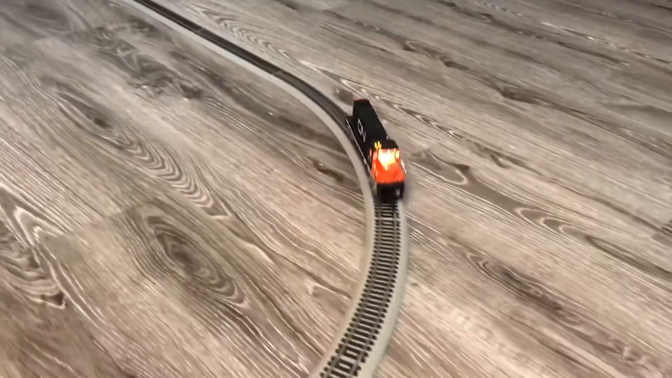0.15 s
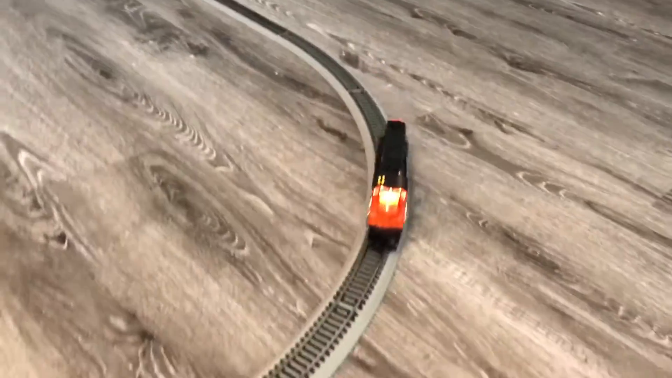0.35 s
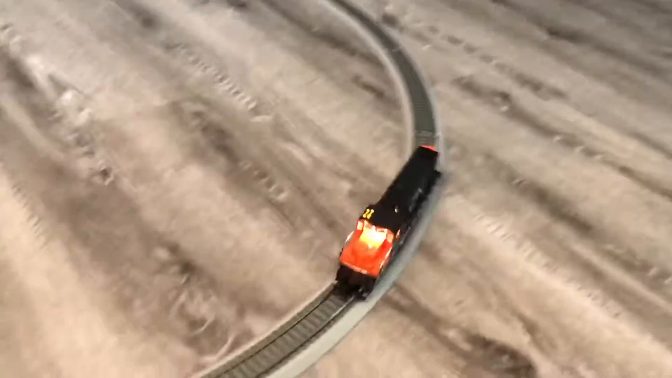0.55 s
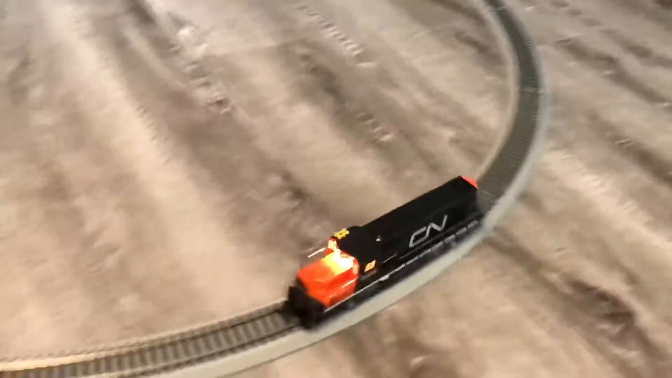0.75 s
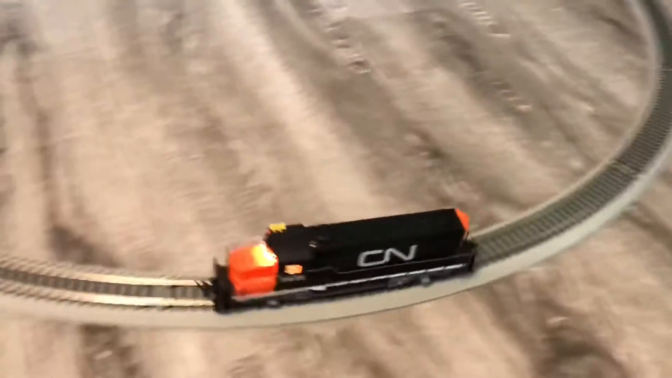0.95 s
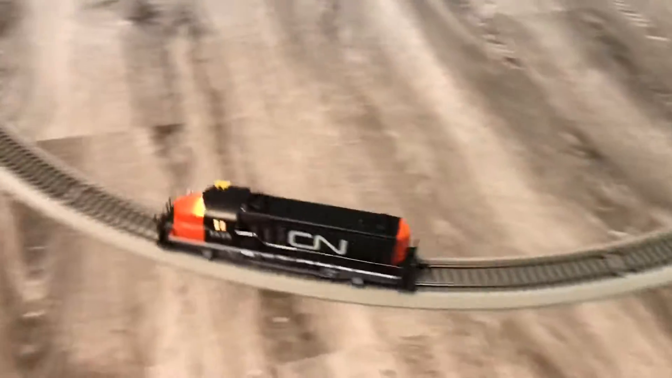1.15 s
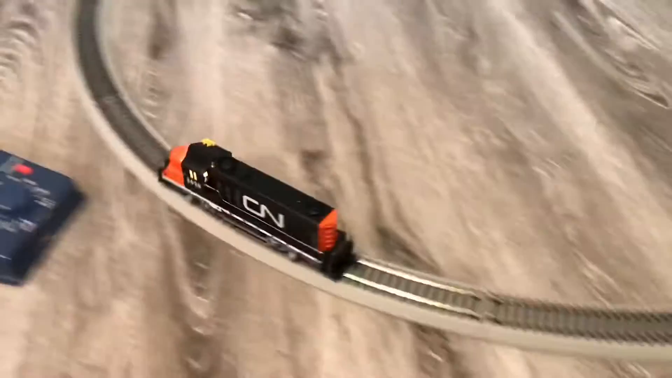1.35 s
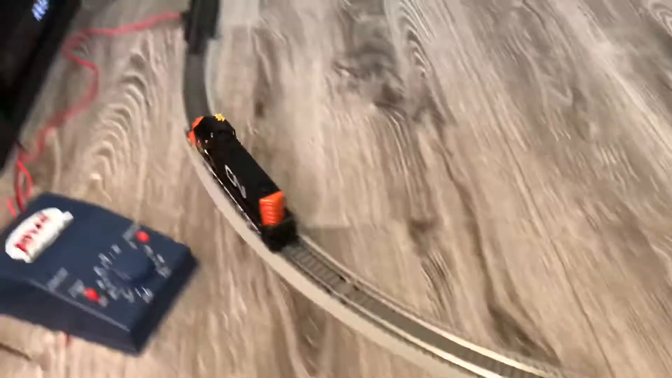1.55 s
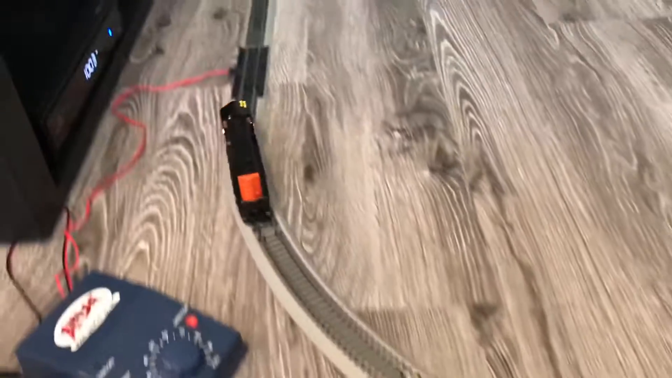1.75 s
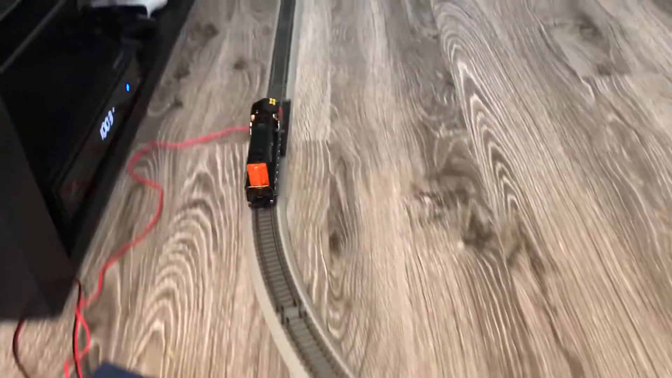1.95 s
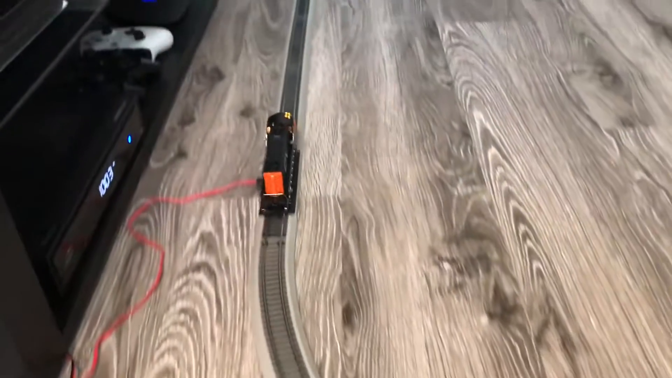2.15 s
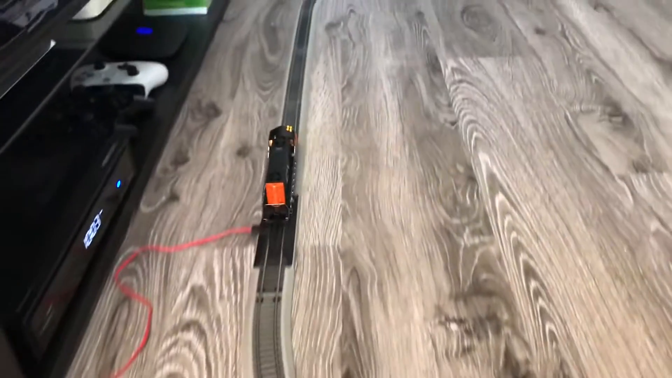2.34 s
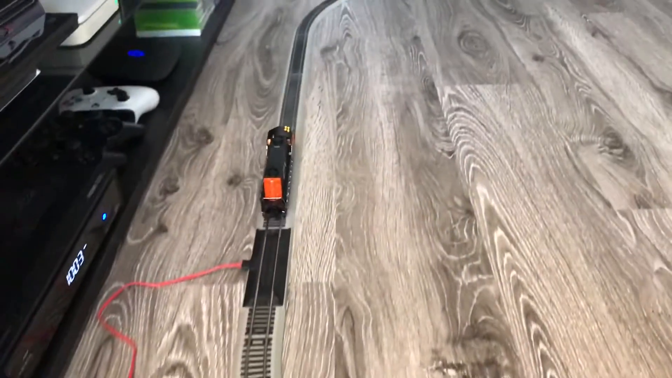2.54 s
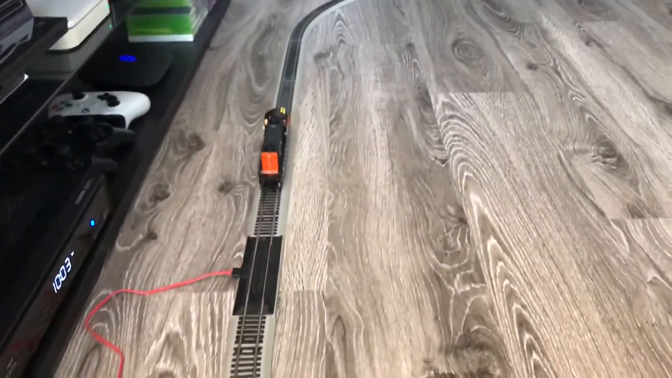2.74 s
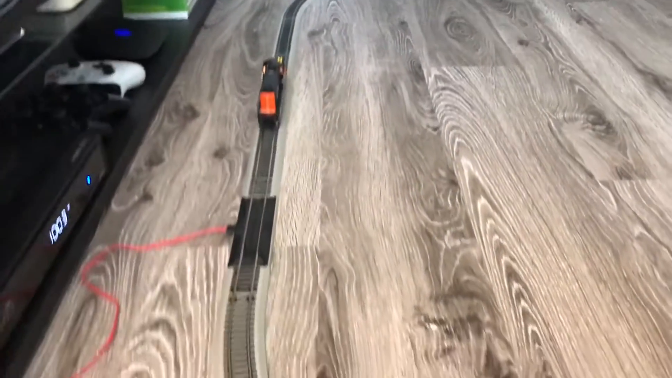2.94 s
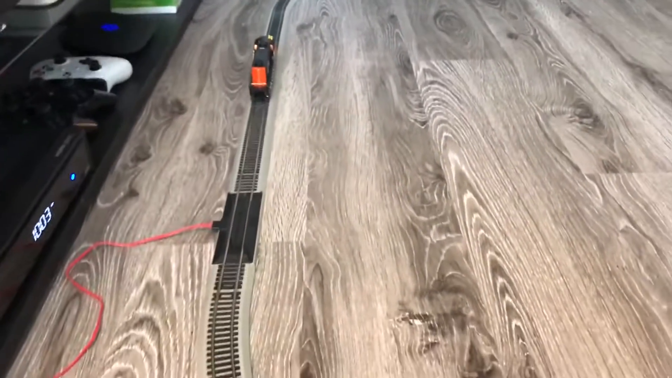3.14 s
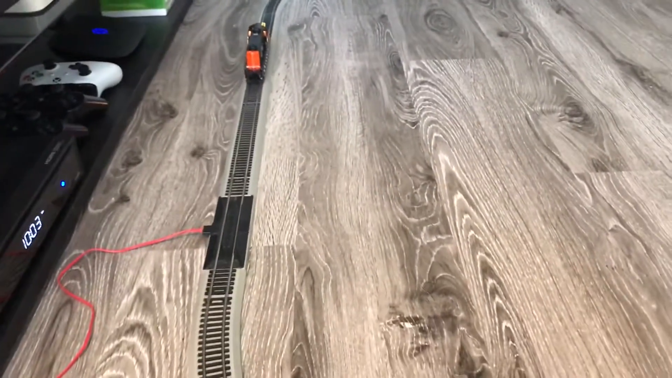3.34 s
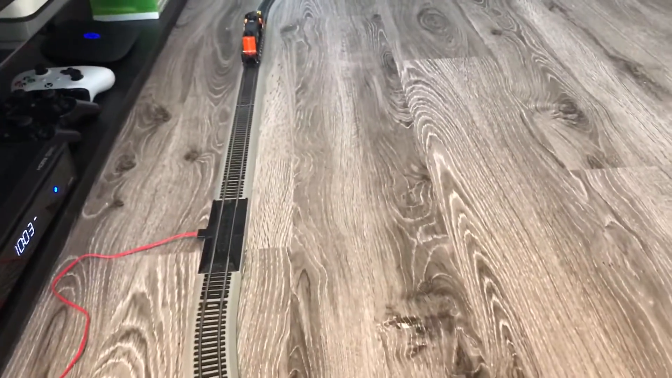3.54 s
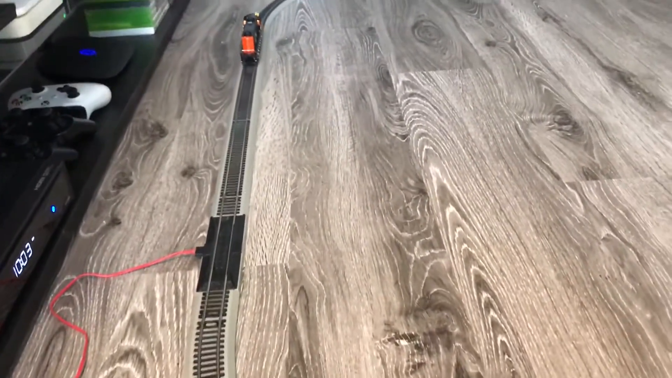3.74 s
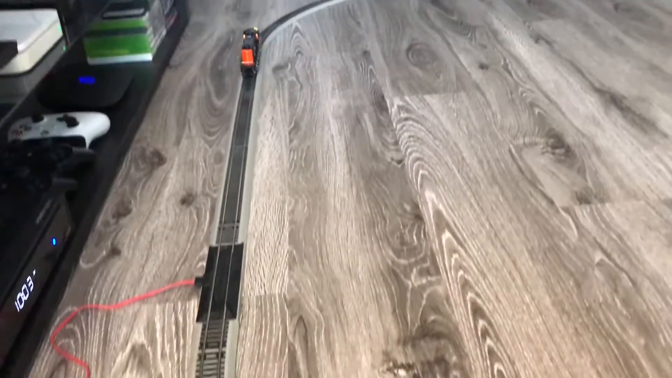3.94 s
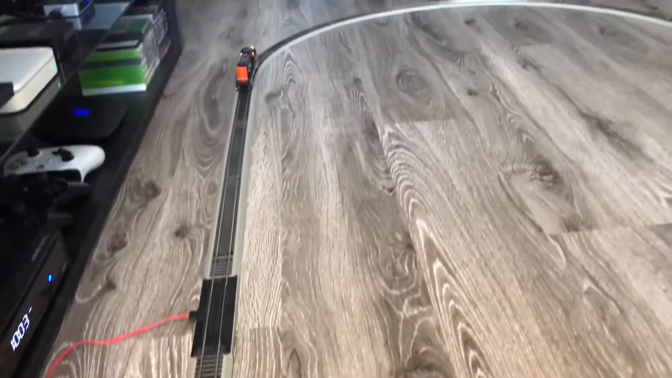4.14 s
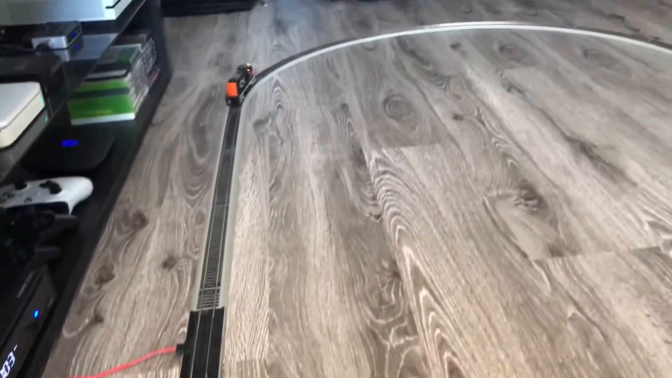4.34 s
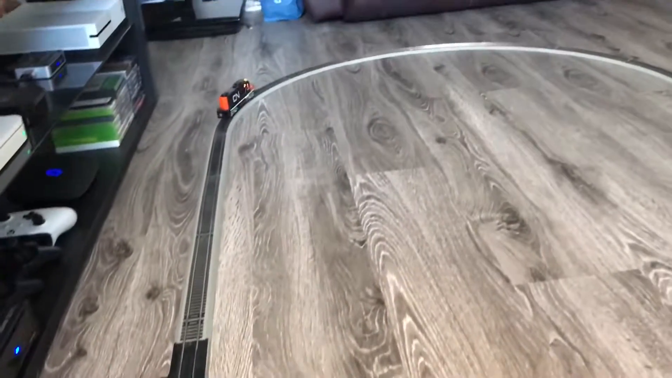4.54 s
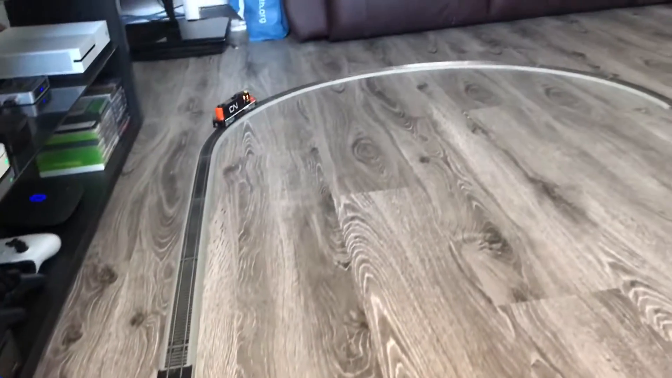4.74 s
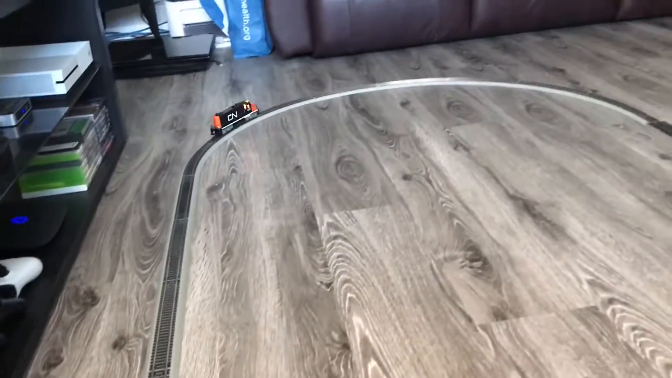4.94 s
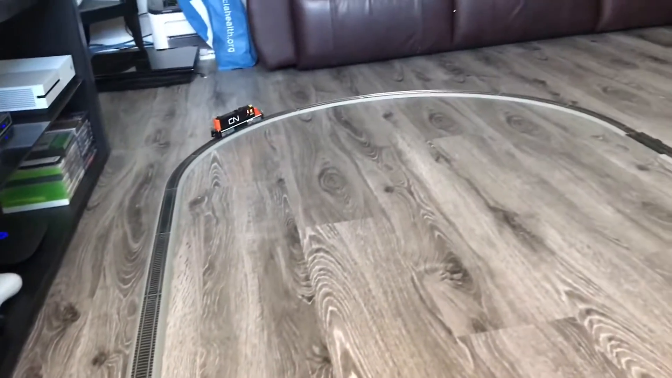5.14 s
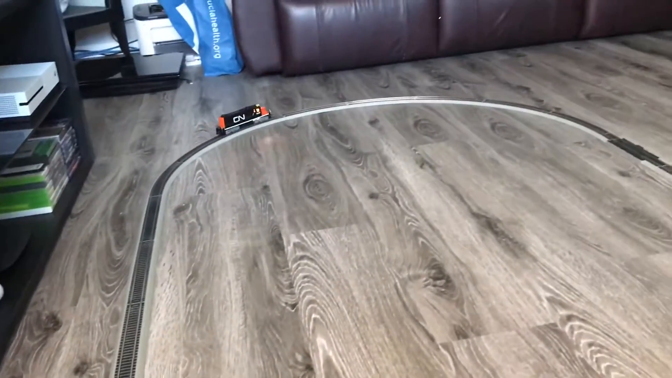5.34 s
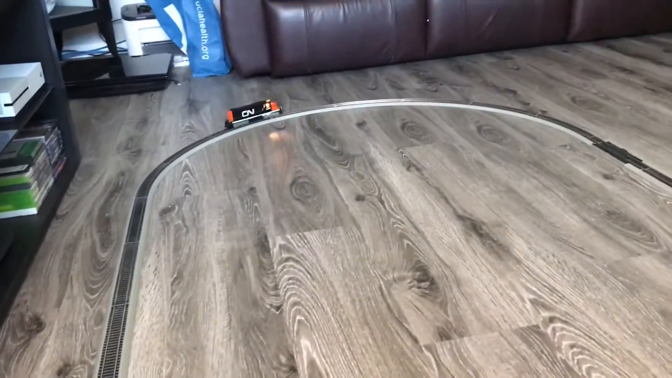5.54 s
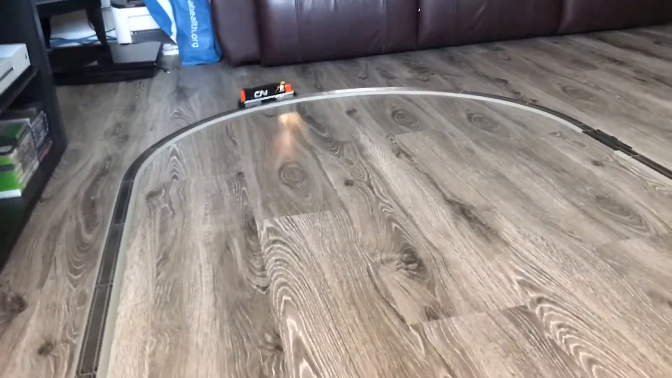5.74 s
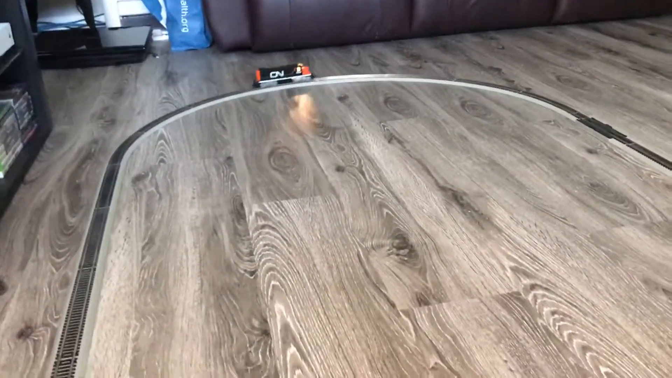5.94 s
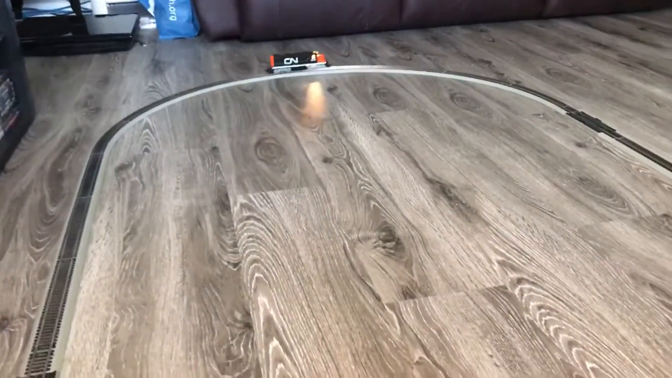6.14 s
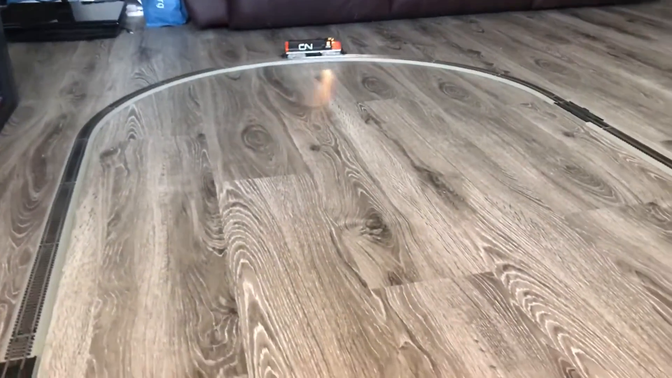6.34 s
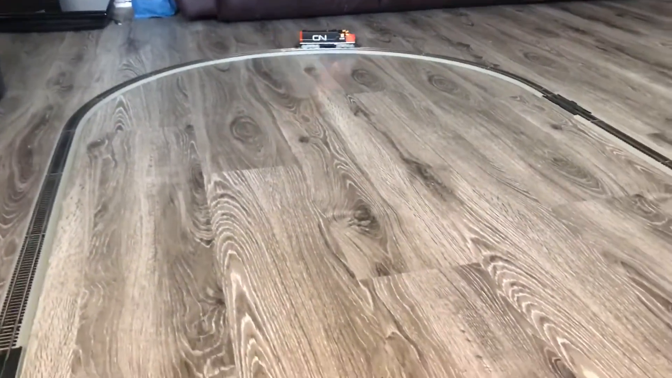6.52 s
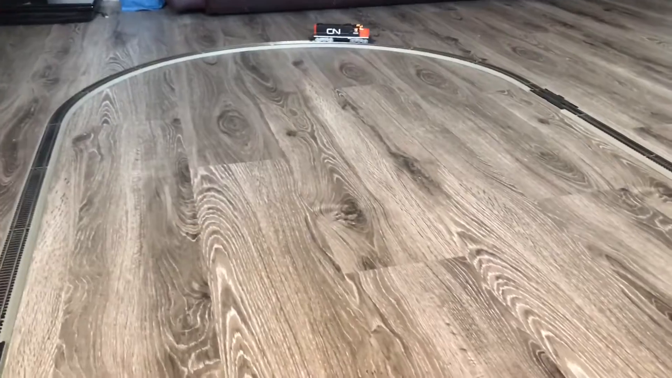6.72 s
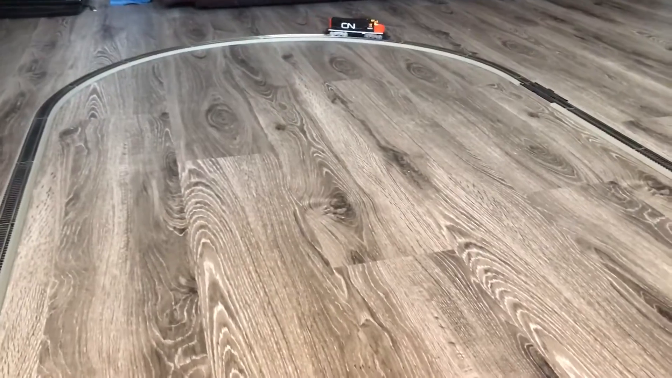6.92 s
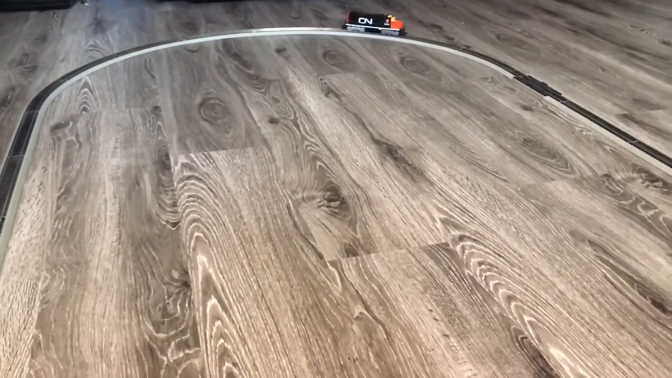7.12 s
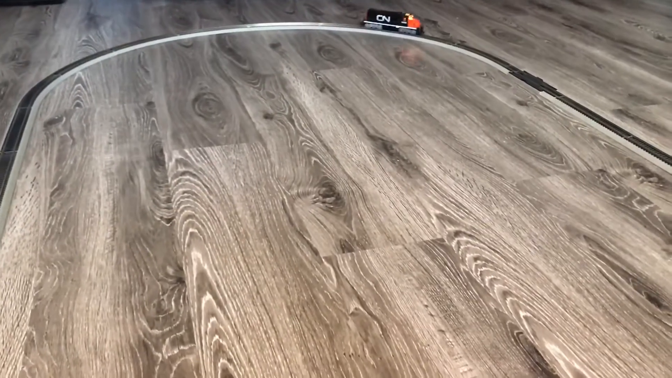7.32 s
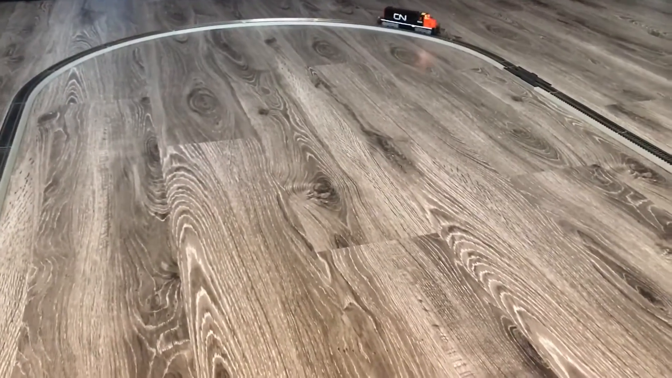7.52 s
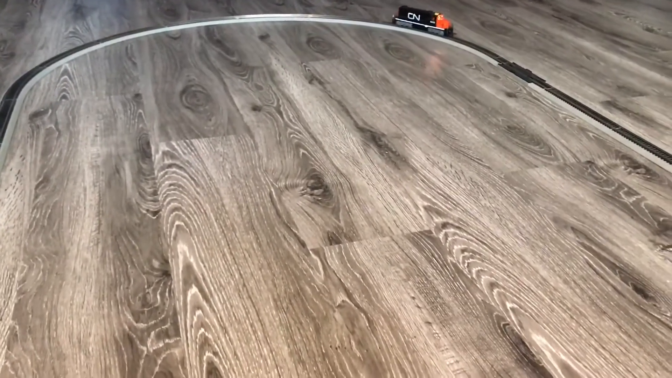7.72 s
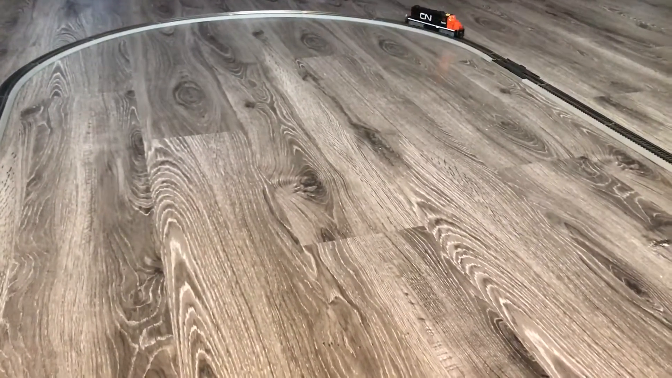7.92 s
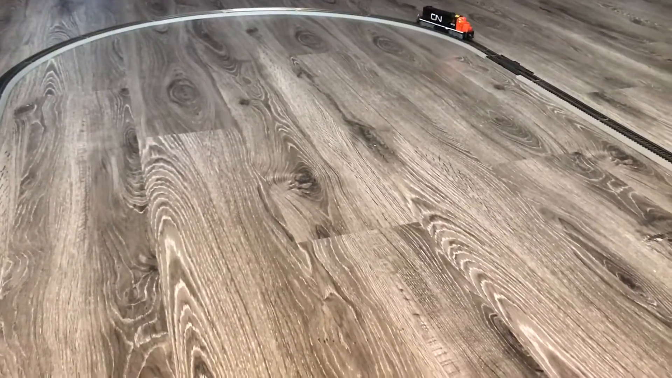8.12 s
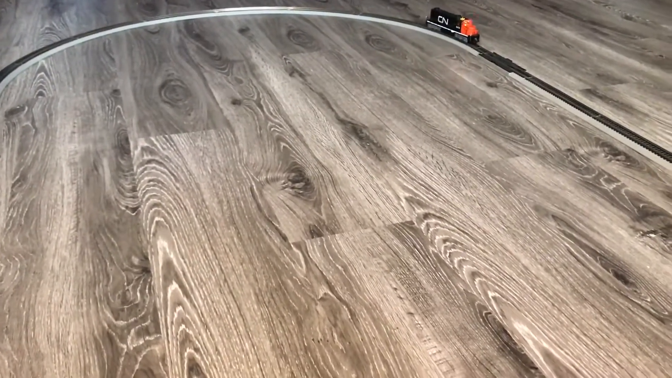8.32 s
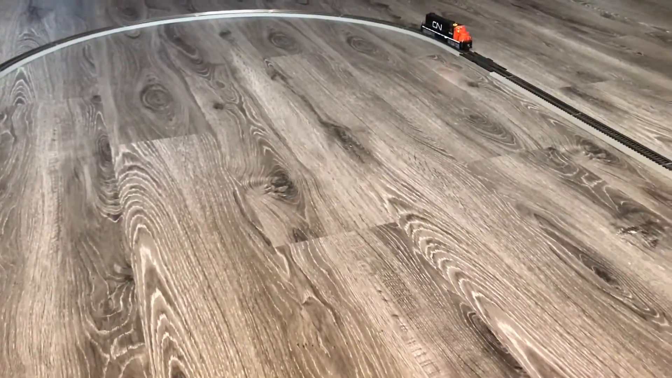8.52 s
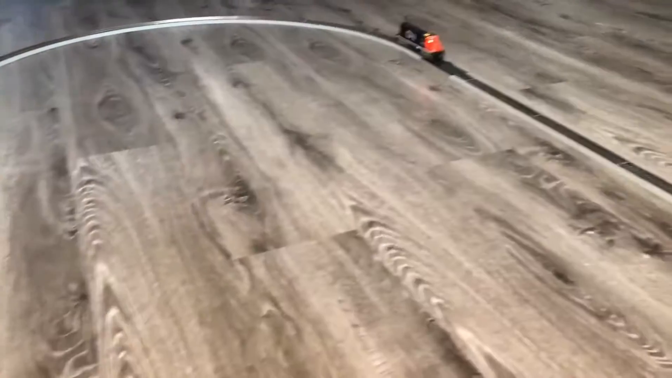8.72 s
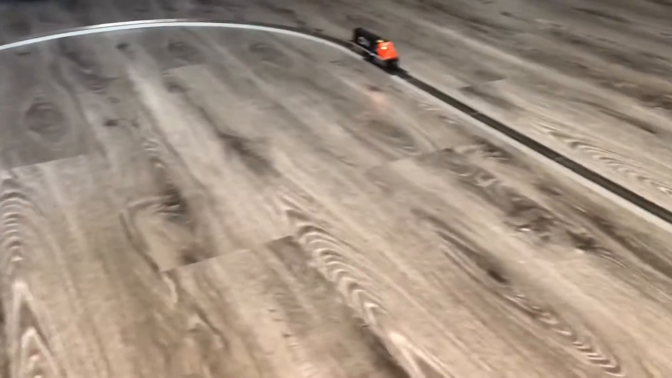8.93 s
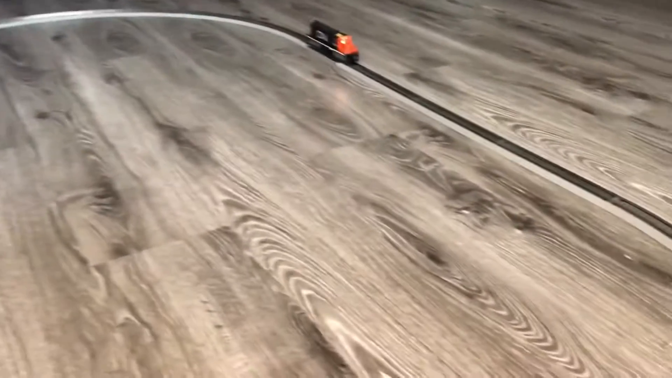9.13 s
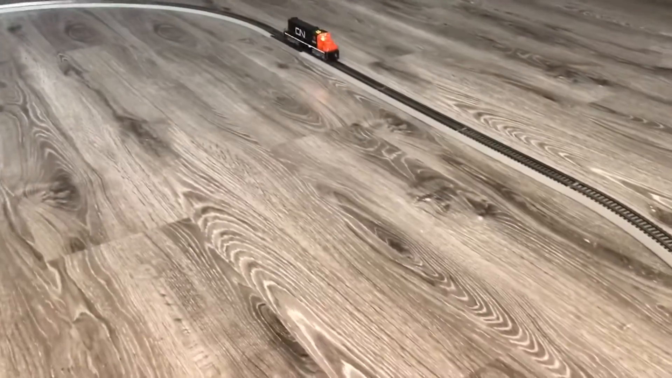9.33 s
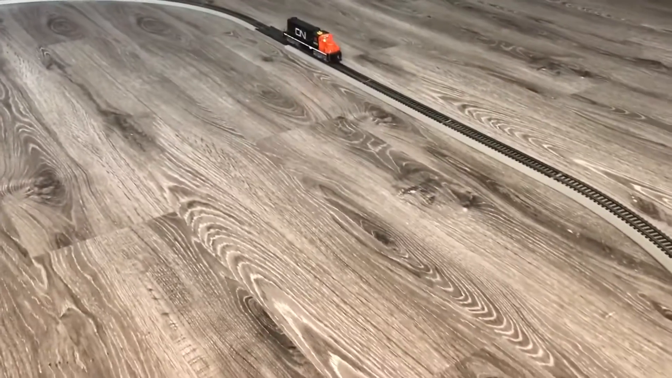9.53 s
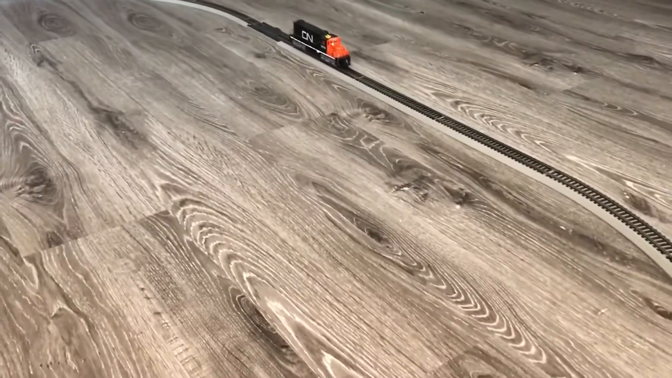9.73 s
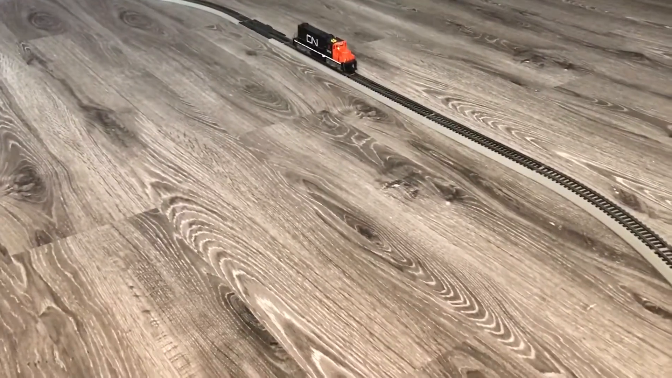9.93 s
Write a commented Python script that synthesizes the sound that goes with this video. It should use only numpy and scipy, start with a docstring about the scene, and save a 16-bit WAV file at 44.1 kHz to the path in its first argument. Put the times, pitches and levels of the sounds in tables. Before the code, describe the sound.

A model locomotive runs continuously round a plastic track on a wooden floor, with a high, wavering gear whir, a dry squeaky edge and gritty rolling hiss. For the first two seconds it passes close to the microphone: metal wheels rattle, click rapidly over rail joints and squeak in the curve, with a few soft knocks from the floorboards. The whir dips in pitch around 1.5 seconds, then rises and is loudest at about 2 seconds. After two more clicks near 2.6 seconds, the rolling grows quieter across the room while the whir keeps swelling and fading, with scattered thin squeaks and brief growls. From about 7.5 seconds the pitch sags as the engine slows. The gears catch in short rasps between 8.5 and 9.6 seconds as the speed briefly recovers. Short room echoes, a low rumble and a faint hum lie underneath.

```python
"""A model locomotive runs round an oval of plastic track on a wooden floor, close by, then across the room.
Its gear teeth whir and squeak at an unsteady pitch that sags as it slows; at times they bind and growl.
The wheels crush grit, rattle and tick over rail joints, and their flanges stick and slip in the curves.
Track bed and floor boards resonate under them. Short room echoes smear the engine's sound,
over a low rumble and a faint hum."""
import sys
import numpy as np
from scipy import signal
from scipy.fft import rfft, irfft, next_fast_len
from scipy.io import wavfile
from scipy.ndimage import uniform_filter1d

SR = 44100
rng = np.random.default_rng(int(sys.argv[2]) if len(sys.argv) > 2 else 0)


def to_wav(sig):
    """Store sig (one row per channel, or 1-D mono) as 16-bit WAV at the path in sys.argv[1].

    Samples outside -1..1 are clipped; the rate is SR.
    """
    pcm = np.clip(np.atleast_2d(sig), -1, 1) * 32767
    pcm = np.round(pcm).astype(np.int16)
    wavfile.write(sys.argv[1], SR, pcm.T)  # frames by channels


N = 439677
T = np.arange(N) / SR
CRUISE_HZ = 1833  # tooth rate at cruising speed


def undb(db):
    """Decibels to gain."""
    return 10 ** (np.asarray(db) / 20)


def unit(x):
    """Scale to rms 1."""
    return x / np.sqrt(np.mean(x ** 2))


def curves(rows):
    """Table columns, interpolated linearly in time."""
    times_s, *columns = np.transpose(rows)
    return [np.interp(T, times_s, column) for column in columns]


def phase_of(hz):
    """Running phase in radians of a varying frequency."""
    return 2 * np.pi * np.cumsum(hz) / SR


def decay(t, t60_s):
    """Envelope that falls 60 dB in t60_s."""
    return np.exp(-np.log(1000) * t / t60_s)


def walk(rate_hz):
    """Smooth random motion, rms 1, rolled off above rate_hz."""
    size = next_fast_len(N, True)
    hz = np.arange(size // 2 + 1) * SR / size
    spectrum = rfft(rng.standard_normal(size)) / (1 + (hz / rate_hz) ** 4)
    return unit(irfft(spectrum, size)[:N])


def sway(rate_hz, settle_s=0.15):
    """Random motion, rms 1, pulled back to centre within settle_s."""
    motion = walk(rate_hz)
    return unit(motion - uniform_filter1d(motion, int(settle_s * SR)))


def grit(per_s, spread_db):
    """Tiny random contacts of uneven size, rms 1."""
    hits = rng.random(N) < per_s / SR
    return unit(hits * rng.standard_normal(N) * undb(spread_db * np.clip(rng.standard_normal(N), -2, 2)))


def burst(start_s, decay_s):
    """Noise with a sudden onset and exponential decay."""
    age_s = T - start_s
    return rng.standard_normal(N) * (age_s >= 0) * np.exp(-np.clip(age_s / decay_s, 0, 20))


def swells(rows, bend, tremble_hz, rasp_db):
    """One trembling tone per row under a bell-shaped envelope."""
    warped_s = np.cumsum(1 + bend * walk(tremble_hz)) / SR
    tones = np.zeros(N)
    for peak_s, length_s, hz, db in rows:
        near = np.abs(T - peak_s) < 2 * length_s
        bell = np.exp(-(2 * (T[near] - peak_s) / length_s) ** 2)
        tones[near] += np.sqrt(2) * undb(db) * bell * np.sin(2 * np.pi * hz * warped_s[near])
    return tones * unit(undb(rasp_db * walk(230)))


def colour(x, spectrum, size=8192):
    """Minimum-phase filter through (Hz, dB) points, falling 20 dB per octave outside them."""
    hz, db = np.transpose(spectrum)
    bin_hz = np.maximum(np.arange(size // 2 + 1) * SR / size, 1)
    octaves_outside = np.maximum(np.log2(hz[0] / bin_hz), 0) + np.maximum(np.log2(bin_hz / hz[-1]), 0)
    gain_db = np.interp(np.log(bin_hz), np.log(hz), db) - 20 * octaves_outside
    cepstrum = irfft(np.log(undb(gain_db)))
    cepstrum[1:size // 2] *= 2
    cepstrum[size // 2 + 1:] = 0
    return signal.fftconvolve(x, irfft(np.exp(rfft(cepstrum))))[:N]


def fade_db(start_s=9.83, db_per_s=40):
    """Closing fall in level."""
    return -db_per_s * np.maximum(T - start_s, 0)


# Each row: time in seconds, tooth rate in Hz.
TOOTH_RATE = [(0, 1742), (.75, 1736), (.95, 1693), (1.1, 1602), (1.5, 1578), (1.88, 1642), (1.96, 1820),
              (2.08, 1900), (2.2, 1880), (2.35, 1815), (2.7, 1863), (3.2, 1793), (3.55, 1817), (3.65, 1752),
              (3.75, 1862), (4.05, 1757), (4.3, 1794), (4.7, 1793), (4.8, 1722), (4.9, 1810), (5.15, 1812),
              (5.7, 1750), (6.0, 1797), (6.6, 1785), (6.85, 1760), (7.15, 1719), (7.5, 1685), (7.9, 1596),
              (8.2, 1520), (8.45, 1520), (8.7, 1443), (9.0, 1506), (9.35, 1650), (9.65, 1626), (9.97, 1469)]


def tooth_hz():
    """Gear meshing rate, proportional to the engine's speed."""
    return curves(TOOTH_RATE)[0]


# Each row: tooth rate in Hz, play from 0 to 1.
DRIVE_PLAY = [(1500, 1), (1790, .82), (1890, .53)]


def drive_play():
    """The gears sit more loosely as they slow."""
    return np.interp(tooth_hz(), *np.transpose(DRIVE_PLAY))


# Each row: time in seconds, distance in metres, side-on view from 0 to 1, flange pressure from 0 to 1.
OVAL_ROUTE = [(0, 0.72, 0.2, 0.95), (.35, 0.7, 0.25, 1), (.7, 0.57, 0.36, 0.48), (1.15, 0.46, 1, 0.6),
              (1.7, 0.42, 0, 0.6), (2.0, 0.6, 0.04, 0.3), (2.27, 1.3, 0.25, 0), (2.7, 1.11, 0.07, 0.1),
              (3.4, 1.87, 0.6, 0.8), (3.9, 2.46, 1, 1), (4.3, 2.03, 0.4, 0.8), (5.3, 2.06, 0.81, 0.57),
              (6.4, 1.99, 1, 0.35), (7.3, 2.5, 0.71, 0.32), (8.7, 2.33, 0.5, 0.54), (9.1, 1.55, 0.52, 0.17),
              (9.97, 2.2, .55, 0.34)]


def rolling(db, far_db, fast_db, side_db=0, press_db=0):
    """Rolling gain: db at 1 m and cruise, far_db per doubled distance, fast_db per 10% more speed."""
    distance_m, side_on, pressure = curves(OVAL_ROUTE)
    speed_steps = 10 * np.log(tooth_hz() / CRUISE_HZ)
    level_db = db + far_db * np.log2(distance_m) + fast_db * speed_steps
    return undb(level_db + side_db * side_on + press_db * pressure + fade_db())


def room(x, wet_db, t60_s, far_db=3.5, tails=3):
    """Direct sound plus shifting echoes, their share wet_db at 1 m plus far_db per doubled distance."""
    t = T[:SR // 2]
    echoes = 0
    for k in range(tails):
        tail = rng.standard_normal(len(t)) * decay(t, t60_s) * (t > 0.003)
        crossfade = np.cos(2 * np.pi * (0.7024 * T + k / tails)) * np.sqrt(2 / tails)
        echoes += signal.oaconvolve(x * crossfade, tail / np.linalg.norm(tail))[:N]
    distance_m = curves(OVAL_ROUTE)[0]
    wet = undb(wet_db + far_db * np.log2(distance_m))
    return (x + wet * echoes) / np.sqrt(1 + wet ** 2)


def mesh_phase(hz, wobble, flutter, wobble_hz=38, teeth=28, runout=0.023):
    """Tooth phase of an out-of-round gear; play scales its runout, wobble and flutter."""
    turn = phase_of(hz / teeth * (1 + 0.1016 * walk(12.14)))
    uneven = runout * np.sin(turn) + wobble * sway(wobble_hz) + flutter * sway(198.4)
    return phase_of(hz * (1 + drive_play() * uneven))


# Each row: time in seconds, level in dB.
WHIR_LEVEL = [(0, -49), (.62, -47), (.71, -31), (.77, -45), (.85, -33.5), (1.05, -35.5), (1.45, -40),
              (1.57, -39), (1.78, -43), (1.94, -26), (2.09, -25.5), (2.18, -29), (2.4, -35), (2.62, -35),
              (2.78, -33.5), (3.27, -37), (3.45, -36), (3.57, -36), (3.64, -33.5), (3.9, -34.5),
              (3.99, -42.5), (4.14, -38.5), (4.44, -34.5), (4.64, -40.5), (4.77, -30), (4.97, -39),
              (5.1, -33.5), (5.33, -38.5), (5.55, -36), (5.82, -33), (5.9, -30), (6.05, -36), (6.25, -33.5),
              (6.5, -35.5), (6.68, -34), (6.87, -32.5), (7.0, -38), (7.14, -38), (7.33, -35), (7.65, -38.5),
              (7.8, -38), (8.17, -35), (8.37, -40.5), (8.9, -40), (9.25, -36), (9.45, -35.5), (9.63, -35.5),
              (9.97, -45.5)]
# Each row: time in seconds, level in dB relative to the rail hiss.
GEAR_SQUEAK_LEVEL = [(0, -12), (1.8, -3.5), (2.5, 0.5), (3.4, 1.5), (4.0, -3), (4.6, -2), (5.6, -4),
                     (6.3, -1), (6.9, 0), (7.5, 2), (8.25, -1), (8.7, -4), (9.4, -2), (9.97, -1.5)]
# Each row: multiple of the tooth rate, gain in dB.
MESH_OVERTONES = [(2, -2), (3, 1), (4, 1), (5, -2.5), (6, -1.5), (7, 3.5)]
# Each row: frequency in Hz, gain in dB.
SHELL_SPECTRUM = [(2500, 1.5), (3600, -1), (4400, 2), (4900, 1.5), (5400, 6.5), (6400, 1), (7200, 4),
                  (7800, -0.5), (8700, 5), (9300, 5.5), (9850, 5.5), (10450, -4), (11200, -5.5),
                  (13000, -11)]


def gears(hiss_gain, rear_db=-4, rasp_db=3, teeth_per_shaft_turn=19.5):
    """The gears of both bogies sing a strong fundamental and scrape out weak, squeaky overtones."""
    hz = tooth_hz() * (1 + 0.00696 * sway(15.9))
    play = drive_play()
    skid = 1.4 * (hz / CRUISE_HZ) ** 5  # tooth faces skid more at speed
    tone, overtones = 0, 0
    for gain, detune in ((1, 1.006), (undb(rear_db) * play, 0.975)):
        shaft = phase_of(hz / teeth_per_shaft_turn * (1 + 0.0815 * walk(20.4)))
        load = gain * undb(play * (3.6 * walk(194) + rasp_db * np.cos(shaft)))  # backlash rasp
        tone += load * np.sin(mesh_phase(hz * detune, wobble=0.02712, flutter=0.027))
        slide = mesh_phase(hz * detune, 0.02407 * skid, 0.0201 * skid, wobble_hz=26, runout=0.017)
        for multiple, db in MESH_OVERTONES:
            overtones += load * undb(db + 4.1 * np.tanh(walk(38))) * np.sin(multiple * slide)
    surge_db = 0.47 * play * walk(16)  # loose gears bite
    whir = unit(tone) * undb(curves(WHIR_LEVEL)[0] + surge_db + fade_db())
    flare = undb(0.94 * sway(22))  # dry teeth
    squeak = unit(colour(overtones * flare, SHELL_SPECTRUM))
    squeak *= hiss_gain * undb(curves(GEAR_SQUEAK_LEVEL)[0])
    return room(whir, wet_db=-7.5, t60_s=0.17) + room(squeak, wet_db=-4, t60_s=0.2)


# Each row: time in seconds, level in dB.
GRIND_LEVEL = [(0, -50), (.6, -42), (1.25, -37.5), (2.0, -46), (2.3, -62), (3.35, -55), (3.8, -56),
               (6.4, -51.5), (7.6, -55), (8.5, -65), (8.7, -46.5), (9.1, -55), (9.97, -54)]


def gear_grind(pitch_ratio=0.81):
    """A slipping gear in each bogie grinds below the whir."""
    hz = pitch_ratio * tooth_hz() * (1 + 0.00696 * sway(15.9))
    grind = sum(np.sin(mesh_phase(hz, wobble=0.0401, flutter=0.06)) for _ in range(2))
    return room(unit(grind) * undb(curves(GRIND_LEVEL)[0]), wet_db=-7.5, t60_s=0.17)


def rush(spectrum, per_s, spread_db):
    """Filtered grit, rms 1."""
    return unit(colour(grit(per_s, spread_db), spectrum))


# Each row: frequency in Hz, gain in dB.
WHEEL_SPECTRUM = [(700, -38.5), (1150, -6.5), (1500, 0.5), (1900, 2), (2200, 2), (2550, -1), (2850, -2.5),
                  (3300, -24), (5000, -11)]
FLANGE_SPECTRUM = [(2400, -24), (2900, -2), (3250, 0.5), (3700, -0.5), (4050, 1.5), (4600, -5),
                   (5100, -6.5), (8000, -21.5)]
RAIL_SPECTRUM = [(2500, -30), (4300, -4.5), (5200, -1.5), (6200, 0.5), (7250, 1), (7900, 1.5), (8700, 2.5),
                 (9400, -2.5), (10050, -4), (10450, -8), (11100, -5.5), (11700, -10.5), (13000, -25)]
FIZZ_SPECTRUM = [(8000, -17), (10000, -2.5), (11200, -4), (13000, -1), (16000, -3.5)]


def wheels(hiss_gain):
    """Metal wheels crush grit and rub their flanges on the rails under uneven pressure."""
    pressure = undb(0.94 * walk(47))
    tread = rush(WHEEL_SPECTRUM, per_s=12000, spread_db=3.5) * rolling(-38.5, far_db=-6.5, fast_db=1.5)
    flange = rush(FLANGE_SPECTRUM, per_s=12000, spread_db=3)
    flange *= rolling(-49, far_db=-6, fast_db=1, press_db=6.5)
    flange *= undb(1.5 * walk(16))  # catches and lets go
    hiss = rush(RAIL_SPECTRUM, per_s=14000, spread_db=0.5) * hiss_gain
    fizz = rush(FIZZ_SPECTRUM, per_s=8700, spread_db=2)
    fizz *= rolling(-50.5, far_db=-6, fast_db=2.5, side_db=5.5)
    return room((tread + flange + hiss + fizz) * pressure, wet_db=-10.5, t60_s=0.29)


# Each row: frequency in Hz, relative level in dB, t60 in seconds.
BOGIE_RING = [(2473, 0, 0.047), (2780, 1.5, 0.038), (3074, 1, 0.033), (3406, 1.5, 0.019), (3730, 1, 0.049),
              (4490, -6, 0.049), (6680, -9, 0.012), (9780, -11, 0.011)]


def bogie_chatter(knocks_per_s=420, drift=0.029):
    """Loose wheels and bogie frames tick, knock and ring at drifting pitches."""
    t = T[:SR // 10]
    ring = 0
    for hz, db, t60_s in BOGIE_RING:
        carrier = np.exp(1j * phase_of(hz * (1 + drift * walk(4.95))))
        knocks = grit(knocks_per_s, spread_db=2.5)
        mode = carrier * signal.oaconvolve(knocks / carrier, decay(t, t60_s))[:N]
        ring += undb(db) * unit(mode.imag)
    ring = unit(ring) * rolling(-44.5, far_db=-6, fast_db=3.5, press_db=7.5)
    ticks = rush(FIZZ_SPECTRUM, per_s=600, spread_db=3) * rolling(-54.5, far_db=-7.5, fast_db=6)
    return room(ring + ticks, wet_db=-14, t60_s=0.22)


def board_ring(x, hz=268.3, t60_s=0.15):
    """The floor board's strongest mode, driven by x; gain 1 at resonance."""
    t = T[:SR // 2]
    envelope = decay(t, t60_s)
    return signal.oaconvolve(x, 2 * envelope * np.sin(2 * np.pi * hz * t) / envelope.sum())[:N]


# Each row: frequency in Hz, gain in dB.
BED_SPECTRUM = [(300, -29.5), (450, -12), (570, -5.5), (740, -5), (850, 1.5), (930, 1.5), (1030, 3),
                (1200, 2.5), (1500, -9), (2200, -4)]
BOARD_SPECTRUM = [(70, 1), (120, 2), (160, 4.5), (215, 0), (245, 2), (275, 2.5), (310, 0.5), (370, 2.5),
                  (450, -4.5), (700, -7.5)]


def track_and_floor(uneven_db=1):
    """The hollow track bed and floor boards resonate unevenly under the wheels."""
    bed = rush(BED_SPECTRUM, per_s=4000, spread_db=0.5) * rolling(-43.5, far_db=-6, fast_db=2)
    boards = rush(BOARD_SPECTRUM, per_s=2500, spread_db=0.5) * rolling(-56, far_db=-5, fast_db=0.4)
    drone = unit(board_ring(grit(per_s=2500, spread_db=3))) * rolling(-65.5, far_db=-12.5, fast_db=6)
    return (bed + boards + drone) * undb(uneven_db * walk(9.5))


# Each row: frequency in Hz, gain in dB.
RUMBLE_SPECTRUM = [(20, -44), (32, -12), (44, -5), (58, 10.5), (68, 7.5), (85, 5), (105, -1.5),
                   (150, -10.5), (300, -30.5)]
# Each row: time in seconds, level in dB.
RUMBLE_LEVEL = [(0, -57.5), (1.1, -59), (1.5, -54), (2.5, -53.5), (5.5, -59.5), (9.97, -56.5)]


def rumble():
    """Low noise in the room."""
    return unit(colour(rng.standard_normal(N), RUMBLE_SPECTRUM)) * undb(curves(RUMBLE_LEVEL)[0])


# Each row: time in seconds, level in dB.
HUM_LEVEL = [(0, -69), (6.9, -78), (7.6, -66.5), (8.4, -60), (8.8, -66.5), (9.15, -68.5), (9.5, -66),
             (9.97, -69)]


def hum(hz=180):
    """A faint, wavering low tone."""
    tone = np.sqrt(2) * np.sin(phase_of(hz * (1 + 0.0094 * walk(9.1))))
    return tone * undb(curves(HUM_LEVEL)[0] + 2.7 * walk(14))


# Each row: start in seconds, snap gain in dB, clack gain in dB.
JOINT_HITS = [(.2057, -30, -26), (0.251, -35, -19), (.341, -35, -24), (0.468, -36, -20), (0.603, -30, -14),
              (0.7358, -26.5, -19), (0.785, -31, -20), (0.871, -34, -22), (0.917, -26.5, -18),
              (1.047, -29, -15), (1.263, -27.5, -17), (1.3086, -29, -15), (1.4408, -30, -20),
              (1.503, -31, -19), (1.6547, -33, -13), (1.836, -25, -11.5), (1.923, -27, -12.5),
              (2.082, -33, -13.5), (2.5879, -42, -17), (2.68, -46, -16.5), (5.8785, -36, -21),
              (9.1, -46, -23)]
# Each row: frequency in Hz, gain in dB, t60 in seconds.
RAIL_RING = [(2890, 7.5, 0.021), (3680, 8, 0.026), (4640, 2.5, 0.062), (5450, 3, 0.03), (6100, -8, .02),
             (12800, 10, .008)]


def rail_joints(ring_db=-22, bed_db=-8):
    """A wheel drops into a gap: a snap, a ring of the rail, a clack of body and track bed."""
    snaps, body, rings = np.zeros((3, N))
    t = T[:SR // 20]
    for start_s, snap_db, clack_db in JOINT_HITS:
        crack = burst(start_s, decay_s=0.0053)
        snaps += crack * undb(snap_db)
        body += crack * undb(clack_db)
        start = int(start_s * SR)
        for hz, mode_db, t60_s in RAIL_RING:
            detune = 1 + 0.084 * rng.standard_normal()  # each rail has its own pitches
            mode = np.sin(2 * np.pi * hz * detune * t) * decay(t, t60_s)
            rings[start:start + len(t)] += mode * undb(clack_db + ring_db + mode_db)
    clacks = colour(body, WHEEL_SPECTRUM) + colour(body, BED_SPECTRUM) * undb(bed_db)
    return room(joint_snap(snaps) + rings + clacks, wet_db=-8, t60_s=0.25)


# Each row: frequency in Hz, gain in dB.
SNAP_SPECTRUM = [(1500, -5), (3500, 5.5), (5500, 8.5), (8000, 3.5), (11000, 0), (16000, 0)]


def joint_snap(cracks):
    """The bright edge of a wheel's impact."""
    return colour(cracks, SNAP_SPECTRUM)


# Each row: peak time in seconds, length in seconds, pitch in Hz, level in dB.
FLANGE_SQUEAKS = [(0.254, 0.088, 3400, -33.5), (0.47, 0.063, 3650, -38), (.62, 0.25, 4480, -40.5),
                  (.6, .4, 9950, -46), (.74, 0.22, 2500, -37.5), (1.33, 0.51, 4490, -42),
                  (1.35, 0.28, 10000, -48), (2.675, 0.25, 3650, -43), (3.1, 0.94, 2520, -48),
                  (3.8, 0.5, 2971, -50), (4.243, 0.28, 3320, -45.5), (4.72, 0.27, 3656, -48),
                  (4.9, 0.59, 8700, -48), (5.48, .15, 4400, -49), (5.953, 0.17, 3440, -46.5),
                  (7.1, .17, 3652, -51), (7.45, .25, 3902, -53), (7.72, 0.19, 9680, -56),
                  (8.24, 0.2, 4570, -51), (8.653, 0.22, 2800, -49), (8.971, 0.21, 6063, -49),
                  (9.55, 0.52, 9790, -53)]


def flange_squeaks():
    """Stick and slip of a flange in a curve rings the wheel briefly."""
    return room(swells(FLANGE_SQUEAKS, bend=0.052, tremble_hz=301, rasp_db=1), wet_db=-11, t60_s=0.079)


# Each row: start in seconds, gain in dB.
FLOOR_KNOCKS = [(0.701, -29), (1.131, -30.5), (1.785, -27), (4.411, -36.5)]


def floor_knocks(ring_db=9):
    """The track knocks on the floor and rings the boards."""
    knocks = sum(burst(start_s, decay_s=0.074) * undb(db) for start_s, db in FLOOR_KNOCKS)
    return colour(knocks, BOARD_SPECTRUM) + board_ring(knocks) * undb(ring_db)


# Each row: peak time in seconds, length in seconds, pitch in Hz, level in dB.
GEAR_BINDS = [(.82, 0.18, 1177, -37.5), (1.1, 0.15, 1496, -36.5), (1.28, 0.062, 1450, -36),
              (1.43, 0.16, 1170, -38), (1.565, 0.066, 1634, -35), (1.68, 0.074, 1023, -36.5),
              (2.465, 0.063, 1820, -32.5), (2.79, 0.098, 1232, -42), (3.42, 0.38, 1267, -45.5),
              (4.471, .011, 1780, -31), (6.32, 0.082, 1670, -32.5), (6.44, 0.13, 1560, -40),
              (7.22, 0.067, 1613, -34), (7.75, 0.057, 1228, -44), (7.93, 0.076, 1330, -49),
              (8.595, 0.024, 1428, -35), (8.643, 0.007, 1440, -30), (8.67, .012, 1400, -28.5),
              (8.72, 0.082, 1224, -42), (8.86, 0.036, 1210, -35), (8.99, .06, 1490, -36),
              (9.063, .011, 1477, -27), (9.195, .012, 1580, -32), (9.243, 0.0097, 1600, -31),
              (9.565, 0.008, 1620, -29), (9.9, 0.087, 1270, -44.5)]


def gear_binds():
    """Tight teeth drag the mesh into short, rough growls."""
    return room(swells(GEAR_BINDS, bend=0.0457, tremble_hz=128.5, rasp_db=3), wet_db=-5, t60_s=0.13)


def scene():
    """Locomotive, track and room in mono; rail hiss and gear squeak share one gain."""
    hiss_gain = rolling(-43, far_db=-3, fast_db=2, side_db=3)
    running = gears(hiss_gain) + gear_grind() + wheels(hiss_gain) + bogie_chatter() + track_and_floor()
    background = rumble() + hum()
    events = rail_joints() + flange_squeaks() + floor_knocks() + gear_binds()
    return (running + background + events)[None]


def record(dry, cutoff_hz=15800):
    """A steep low-pass cuts the top treble."""
    return signal.sosfilt(signal.ellip(12, 0.1, 80, cutoff_hz, fs=SR, output="sos"), dry)


dry = scene()
out = record(dry)
to_wav(out)
```